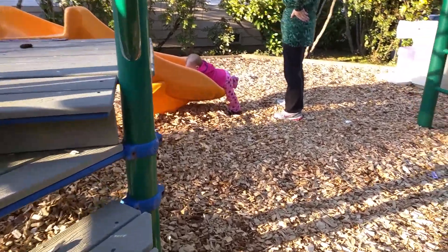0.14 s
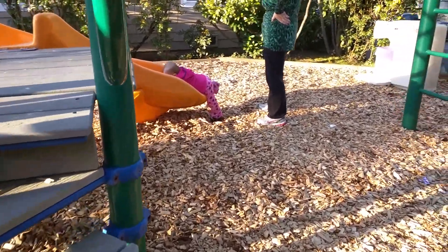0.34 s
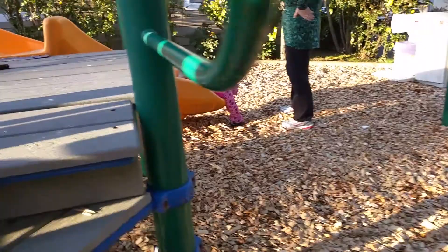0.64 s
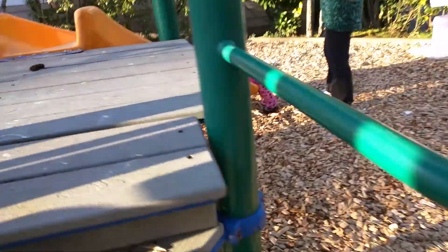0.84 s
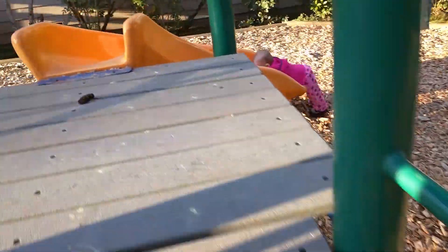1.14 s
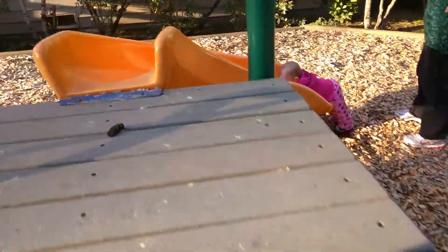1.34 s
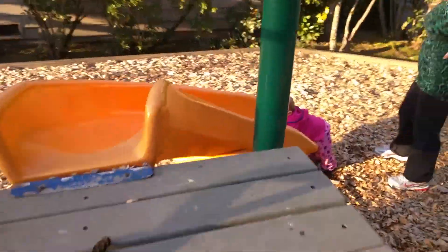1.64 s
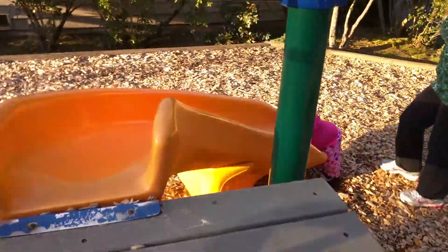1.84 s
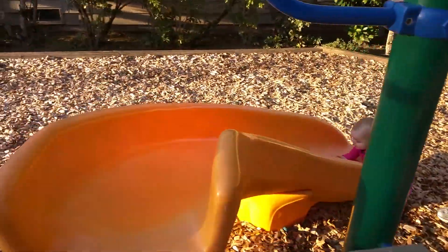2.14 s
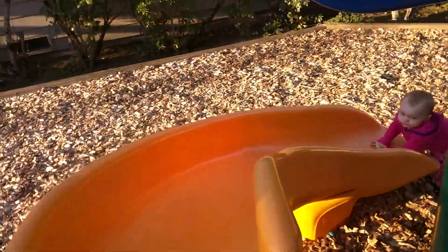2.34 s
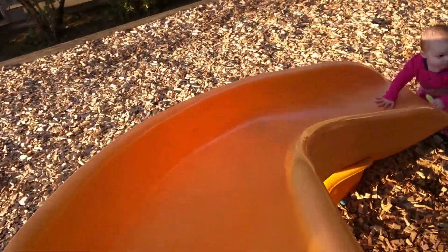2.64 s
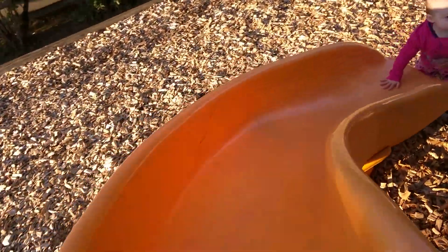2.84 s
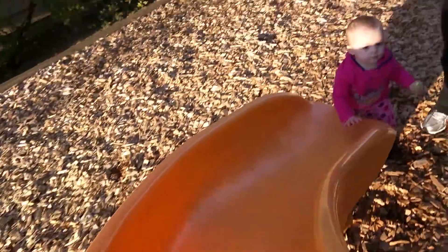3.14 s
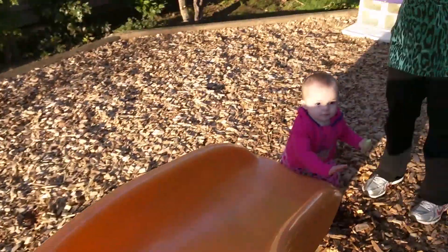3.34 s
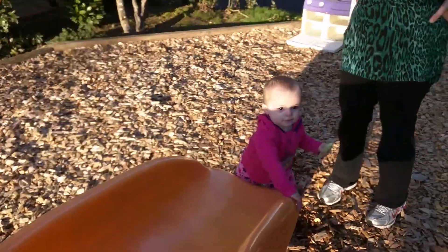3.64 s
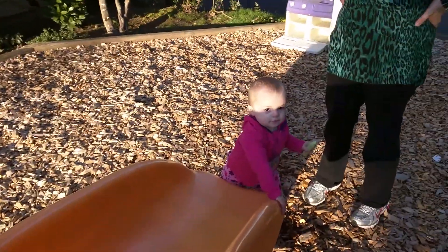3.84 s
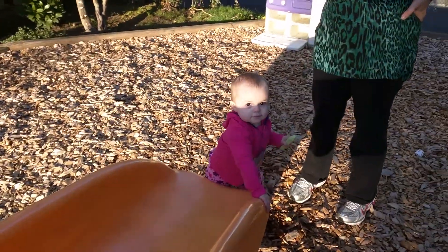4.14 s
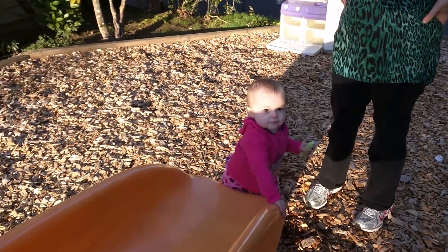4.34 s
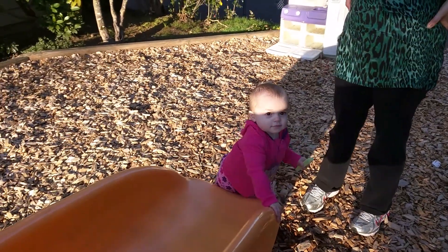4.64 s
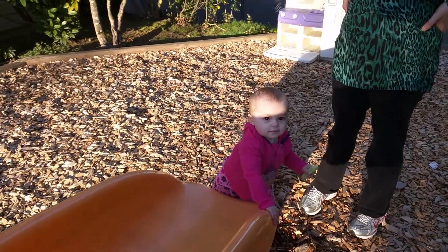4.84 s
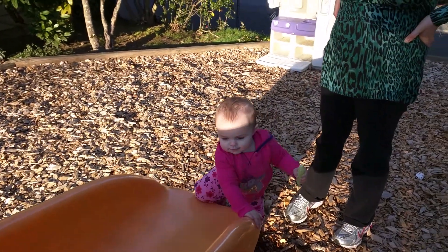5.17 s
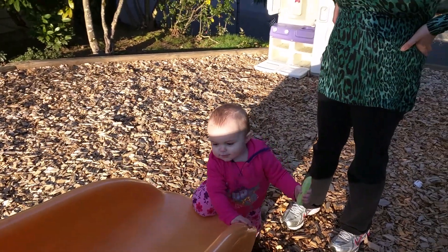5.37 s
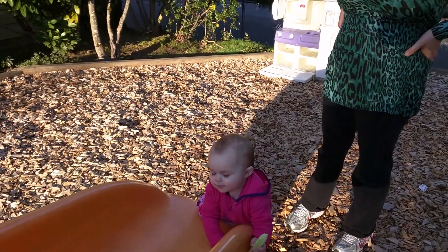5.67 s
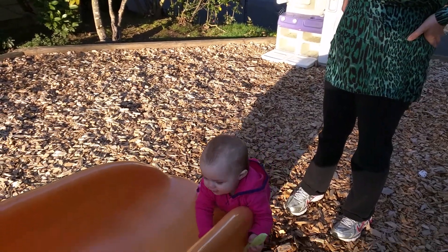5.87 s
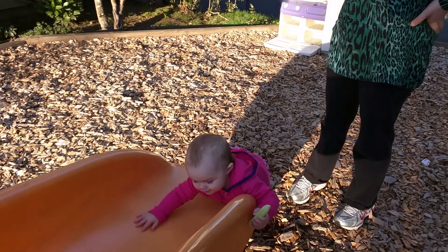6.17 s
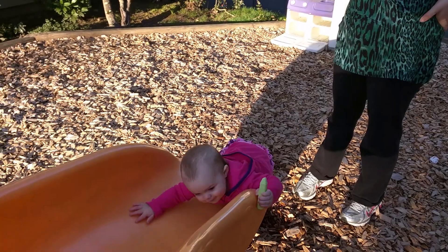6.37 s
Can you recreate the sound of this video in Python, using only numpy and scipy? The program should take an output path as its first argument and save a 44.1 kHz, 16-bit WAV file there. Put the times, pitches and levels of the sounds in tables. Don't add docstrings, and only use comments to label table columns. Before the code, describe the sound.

Low wind rumble and handling bumps on a small close microphone, with faint far traffic in an open play area. Uneven shoe knocks on hollow boards build to a loud stamp with creak, boom and short clank. Another step, a crisp snapping crunch on chips, and a fainter last step. Several quiet seconds with barely audible bird notes, then one open-hand slap on hollow plastic and a faint dragging palm.

```python
import sys
import numpy as np
from scipy import signal
from scipy.fft import rfft, irfft, next_fast_len
from scipy.io import wavfile
from scipy.ndimage import uniform_filter1d

SR = 44100
rng = np.random.default_rng(int(sys.argv[2]) if len(sys.argv) > 2 else 0)


def master_out(mix):
    frames = np.transpose(np.atleast_2d(mix))
    ceiling = np.clip(frames, -1, 1)
    pcm = np.round(ceiling * 32767).astype(np.int16)
    wavfile.write(sys.argv[1], SR, pcm)


def elevation(decibels):
    levels = np.asarray(decibels, float)
    return 10 ** (levels / 20)


N = 286994

# (t/s, peak level/dB, contact/ms, ring factor/1)
BLOWS = [(0.615, -43.5, 0.16, 1.3), (0.675, -25.5, 0.33, 0.54), (1.077, -38, 2.2, .7),
         (1.153, -36.5, 1, 0.47), (1.173, -36.5, 2.1, .7), (1.277, -27.5, 1.7, 0.39),
         (1.481, -23, 1.2, 0.24), (1.49, -8, 0.27, 1.06), (1.493, -11, 0.27, 1.15),
         (1.518, -19.5, 0.5, 0.6), (1.526, -17, 0.48, 0.92), (1.548, -19, 0.64, 3.36),
         (1.794, -38.5, 0.93, 0.86), (1.975, -40, 0.68, 1.1), (2.254, -25.5, 0.83, 0.84),
         (2.276, -25, 0.4, 2.2), (2.283, -30, 0.25, 0.61), (2.306, -28, 0.38, 1.4), (2.409, -39, 0.21, 5),
         (2.941, -36.5, 0.91, 1), (2.967, -27.5, 0.64, 1.25), (3.257, -34, 0.94, 0.5),
         (3.282, -42, 0.82, 0.94), (3.542, -40, 1.4, 0.64)]
# (f/Hz, level/dB, t60/s)
DECK = [(331, -5, 0.051), (574, -3.5, 0.041), (736, 0.5, 0.036), (824, -5, 0.034), (1017, 2, 0.041),
        (1250, 1.5, 0.013), (1412, -6, 0.14), (1800, 4.5, 0.025), (1930, 13.5, 0.013), (2230, 13, 0.011),
        (2900, 15, 0.0076), (3360, -4, 0.059), (4290, 3.5, 0.012), (5560, -8, .02), (6600, 3, 0.018)]
# (t/s, flexing level/dB, settling/s, boom level/dB)
WEIGHT = [
    (0.68, -37, 0.043, -60),
    (1.506, -27.5, 0.17, -24),
    (2.266, -36.5, 0.29, -39),
    (2.97, -40.5, 0.097, -55),
    (3.27, -44.5, 0.11, -64),
]
# (f/Hz, level/dB, t60/s)
SLIDE = [(135, -10.5, .2), (201, -7, 0.18), (258.4, -3, 0.23), (328.4, -1.5, 0.2), (421, -6.5, .13),
         (520, -6.5, 0.12), (639, -4.5, 0.12), (802, -4.5, 0.094), (953, -4.5, .085), (1150, -4, .07),
         (1436, -10, .07), (1810, -5.5, 0.056), (2190, -9.5, 0.04), (2900, -11.5, 0.037)]


def evened(x):
    return x / np.sqrt(np.mean(x ** 2) + 1e-20)


def add(mix, t_s, sound):
    part = mix[round(t_s * SR):][:len(sound)]
    part += sound[:len(part)]


def coloured(x, points):
    hz, db = np.transpose(points)
    size = next_fast_len(len(x))
    f_hz = np.fft.rfftfreq(size, 1 / SR)
    gain = elevation(np.interp(np.log(f_hz + 1), np.log(hz + 1), db))
    return evened(irfft(rfft(x, size) * gain, size)[:len(x)])


def grit(per_s, spread_db):
    size = elevation(spread_db * np.minimum(rng.exponential(1, N), 5))
    return size * rng.standard_normal(N) * (rng.random(N) < per_s / SR)


def flutter(span, depth_db):
    smooth = uniform_filter1d(rng.standard_normal(N), span)
    return elevation(depth_db * evened(uniform_filter1d(smooth, span)))


def strokes(rows, roundness=0.84):
    out = np.zeros(N)
    for peak_s, db, rise_s, fall_s in rows:
        t = np.arange(max(peak_s - 3 * rise_s, 0), peak_s + 4 * fall_s, 1 / SR)
        away = np.maximum((peak_s - t) / rise_s, (t - peak_s) / fall_s)
        add(out, t[0], elevation(db - 20 * away ** roundness))
    return out


def ring(modes, contact_ms, factor=0.62, spread_db=0., detune=0.052, cycles=0.36):
    t = np.arange(12000) / SR
    luck = rng.standard_normal((len(modes), 3, 2))
    out = np.zeros(len(t))
    for (hz, db, t60_s), trio in zip(modes, luck):
        onset = 1 - np.exp(-(t * hz / cycles) ** 2)
        for side, (level, phase) in zip((-1, 0, 1), trio):
            decay = elevation(db + spread_db * level - 60 * t / (t60_s * factor))
            out += decay * onset * np.sin(2 * np.pi * (hz * (1 + detune * side) * t + phase))
    u = np.arange(200) / SR * 1000 / max(contact_ms, .03)
    out = np.convolve(out, u * np.exp(-4 * u))
    return out / np.sqrt(np.mean(out[:400] ** 2)) / 3


def shaken(modes, contact_ms, factor, per_s, spread_db):
    body = ring(modes, contact_ms, factor, detune=0.083)
    return evened(signal.oaconvolve(grit(per_s, spread_db), body)[:N])


def deck_blows():
    out = np.zeros(N)
    for t_s, db, contact_ms, factor in BLOWS:
        add(out, t_s + .001, elevation(db) * ring(DECK, contact_ms, factor, spread_db=2., detune=.045))
    return out


def deck_rattle():
    rows = []
    for t_s, db, contact_ms, factor in BLOWS:
        rattle_db = db - 11 + 0.22 * (db + 16)
        rows.append((t_s + .003, rattle_db, .002, 0.034 * factor))
    return strokes(rows) * shaken(DECK, 0.54, 0.36, 5000, 2.3)


def joists():
    # (f/Hz, level/dB, t60/s)
    joist_modes = [(168, 4, 0.052), (244.5, 8.5, 0.065), (334, -6, 0.062), (387, 2, 0.043)]
    rise_s = .012
    rows = [(t_s, db, rise_s, settle_s) for t_s, db, settle_s, boom_db in WEIGHT]
    return strokes(rows, roundness=1.43) * shaken(joist_modes, 0.73, 0.93, 3000, 2.24)


def underdeck_boom():
    # (low f/Hz, high f/Hz, share of the high one/1, 20 dB fall/s)
    low_hz, high_hz, share, fall_s = (112., 128., 0.7, .13)
    rise_s = .03
    t = np.arange(15000) / SR
    boom = np.sin(2 * np.pi * low_hz * t) - share * np.sin(2 * np.pi * high_hz * t)
    boom = boom * elevation(-20 * (t / fall_s) ** 1.66) * np.minimum(t / rise_s, 1)
    out = np.zeros(N)
    for t_s, flex_db, settle_s, boom_db in WEIGHT:
        add(out, t_s - .002, elevation(boom_db + 3.) * boom)
    return out


def bracket():
    # (t/s, peak level/dB)
    clanks = [
        (1.526, -37),
        (1.554, -28),
        (1.567, -26.5),
        (1.596, -36),
        (2.409, -46),
        (2.945, -35),
        (2.969, -31),
    ]
    # (f/Hz, level/dB, t60/s)
    bracket_modes = [(2170, 2, .06), (3520, -6, 0.087), (5840, -4.5, 0.076), (6850, -5, 0.09)]
    out = np.zeros(N)
    for t_s, db in clanks:
        add(out, t_s, elevation(db) * ring(bracket_modes, .06, 0.97, spread_db=2., detune=0.0192))
    return out


def chip_snaps():
    # (t/s, peak level/dB, centre f/Hz)
    snaps = [(0.0228, -36, 8960), (0.6155, -38, 6390), (0.6759, -26, 5600), (1.4814, -24.5, 4020),
             (1.5539, -26, 9800), (1.5674, -31, 6870), (2.256, -32.5, 4170), (2.2832, -29, 4000),
             (2.3622, -35, 6160), (2.9444, -33, 4040), (2.9537, -20, 14100), (2.9602, -8, 7040),
             (2.9646, -3, 14500), (2.9674, -6, 8500), (2.972, -10, 5000), (2.9724, -6, 14500),
             (2.982, -15, 9150), (2.9904, -17, 10000), (2.9954, -18, 14500), (3.0224, -27, 14200),
             (3.0298, -24, 8520), (3.0365, -14.5, 9600), (3.0532, -22.5, 9260), (3.2231, -25.5, 9130),
             (3.251, -33, 10300), (3.2685, -24, 10800), (3.3258, -32.5, 9190), (3.449, -32.5, 10600),
             (3.9469, -43, 13600), (4.5057, -30.5, 13700)]
    width = 1.24
    out, t = np.zeros(N), np.arange(1500) / SR
    for t_s, db, hz in snaps:
        burst = rng.standard_normal(len(t)) * (elevation(-60 * t / .003) + .2 * elevation(-60 * t / .016))
        edges_hz = [hz / width, min(hz * width, 17000)]
        burst = signal.lfilter(*signal.butter(2, edges_hz, "band", fs=SR), burst)
        add(out, t_s + .0008, elevation(db - 1.5) * burst / abs(burst).max())
    return out


def chip_crunch():
    # (peak t/s, level/dB, rise/s, fall/s)
    crunch = [(1.49, -40, .008, 0.17), (1.556, -41, .008, 0.04), (2.26, -49, .004, 0.24),
              (2.364, -38, 0.0097, 0.011), (2.434, -49, 0.028, .017), (2.97, -15, 0.019, 0.021),
              (3.002, -46, .005, 0.034), (3.04, -40.5, .05, 0.039), (3.11, -47, 0.054, .012),
              (3.226, -45.5, .012, 0.0079), (3.264, -40.5, 0.016, .04)]
    # (f/Hz, density level/dB)
    chip_colour = [(880, -39), (1500, -28), (1810, -5), (2290, -1.5), (2900, -10.5), (4610, -1), (4940, -4),
                   (9560, -2), (11800, -4), (14700, -5), (15800, -5.5)]
    cloud = coloured(grit(13000, 2.3), chip_colour) * flutter(span=120, depth_db=-5.5)
    return elevation(-3.5) * strokes(crunch) * cloud


def slide_slap():
    # (t/s, peak level/dB)
    slaps = [
        (5.621, -7),
    ]
    # (start f/Hz, end f/Hz, fall/s, peak level/dB)
    start_hz, end_hz, fall_s, sweep_db = (1650, 380, .004, -10.5)
    t = np.arange(1500) / SR
    turns = np.cumsum(end_hz + (start_hz - end_hz) * np.exp(-t / fall_s)) / SR
    sweep = np.sin(2 * np.pi * turns) * np.minimum(t / 0.0011, 1) * np.exp(-(t / 0.0087) ** 3)
    crack = rng.standard_normal(len(t)) * elevation(-17.5 - 60 * t / 0.007)
    out = np.zeros(N)
    for t_s, db in slaps:
        add(out, t_s + 0.00117, elevation(db - 3) * ring(SLIDE, 0.1, 0.79, cycles=0.81))
        add(out, t_s + .0014, elevation(sweep_db) * sweep + uniform_filter1d(crack, size=3))
    return out


def slide_rub():
    # (peak t/s, level/dB, rise/s, fall/s)
    rubs = [
        (5.655, -33, 0.0098, 0.056),
        (5.78, -40, 0.17, 0.11),
        (6.26, -45, 0.19, .14),
    ]
    # (f/Hz, density level/dB)
    palm_colour = [(120, -50), (200, -19), (230, -8), (446, -12), (620, -0.5), (1090, -4.5), (2300, -14.5),
                   (4000, -32), (5200, -53), (8800, -120)]
    shell = 0.51 * shaken(SLIDE, 0.056, 0.43, 6500, 1.0)
    skin = 0.46 * coloured(grit(9000, 1.9), palm_colour)
    return elevation(-1.0) * strokes(rubs, roundness=1.73) * (shell + skin)


def swish():
    # (peak t/s, level/dB, rise/s, fall/s, rustle share/dB)
    swings = [(0.03, -52.5, 0.089, 0.076, -2.5), (0.38, -40.5, .28, .3, -5),
              (0.704, -48.5, 0.016, 0.02, -4), (0.81, -39, .13, .11, -8.5), (1.02, -50, 0.18, 0.25, -3.5),
              (1.28, -45.5, .16, 0.34, -5), (1.6, -52.5, .2, 0.14, -9), (1.97, -50, 0.43, 0.31, -2),
              (2.4, -55, 0.37, 0.18, -3), (2.56, -58, 0.11, .06, -1), (2.74, -50, .2, 0.21, 0.5),
              (2.97, -50, 0.12, 0.28, -2), (3.28, -50, 0.11, 0.22, -7), (3.46, -58, 0.15, 0.11, -10),
              (3.61, -54, 0.14, 0.23, -8), (5.66, -57.5, .05, .15, -4), (5.8, -53, 0.13, .08, -3.5),
              (6.05, -62, 0.079, 0.17, -20), (6.23, -59.5, 0.17, 0.19, -8)]
    # (f/Hz, density level/dB)
    hiss_colour = [(1760, -53), (3000, 0), (4450, -7), (5400, -5), (9020, -0.5), (12400, -1), (15000, -2.5),
                   (15700, -5.5)]
    # (f/Hz, density level/dB)
    rustle_colour = [(410, -5), (700, -5.5), (1060, -16), (1170, -5.5), (1280, -6), (1930, -2),
                     (5000, -11.5), (6500, -10), (11000, -120)]
    hiss = coloured(grit(15000, 0.65), hiss_colour) * strokes([row[:4] for row in swings], roundness=1.67)
    dull = [(t_s, db + share_db, rise_s, fall_s) for t_s, db, rise_s, fall_s, share_db in swings]
    rustle = coloured(grit(9000, 2.6), rustle_colour) * strokes(dull, roundness=2.0)
    return elevation(-2.5) * flutter(span=500, depth_db=0.22) * (hiss + rustle)


def case_jolts():
    # (t/s, peak level/dB, swing f/Hz)
    jolts = [(0.744, -27, 27.78), (0.822, -27, 59.5), (0.901, -17.5, 28.3), (1.049, -26, 24.2),
             (1.497, -30, 76), (2.25, -21.5, 28), (2.94, -24, 22.3), (4.271, -34, 47), (5.272, -33, 36.3)]
    out = np.zeros(N)
    for t_s, db, hz in jolts:
        u = np.arange(0, 1.6, hz / SR)
        swing = np.sin(2 * np.pi * u) * 3.2 * u * np.exp(-1.5 * u ** 2)
        add(out, t_s, -elevation(db) * swing * np.hanning(len(u)) ** .3)
    return out


def bird():
    # (start t/s, length/s, f/Hz, level/dB)
    calls = [(3.11, 0.09, 6270, -55), (3.297, .2, 6400, -55), (3.498, .11, 6400, -55),
             (4.62, .19, 6350, -61), (4.82, .25, 6660, -59.5), (5.04, 0.18, 6400, -60),
             (3.123, 0.103, 4860, -55), (4.66, .12, 5000, -61), (4.94, 0.12, 5040, -64)]
    arch_share, sag_share = 0.019, .035
    out = np.zeros(N)
    for t_s, length_s, hz, db in calls:
        arch = np.sin(np.linspace(0, np.pi, round(length_s * SR)))
        sag = np.linspace(-.5, .5, len(arch))
        fuzz = uniform_filter1d(rng.standard_normal((12000, 2)), size=100, axis=0)[:len(arch)]
        turn = 2 * np.pi * np.cumsum(hz * (1 + arch_share * (arch - .6) - sag_share * sag)) / SR
        tone = evened(fuzz[:, 0] * np.cos(turn) + fuzz[:, 1] * np.sin(turn))
        add(out, t_s, elevation(db - 6.5) * tone * arch ** .5)
    return out


def wind():
    # (t/s, level/dB)
    gusts = [(0.0, -36.5), (0.18, -45), (0.47, -41.5), (0.69, -39.5), (0.84, -34), (1.07, -41.5),
             (1.25, -39), (1.4, -41), (1.55, -28), (1.8, -38.5), (2.05, -45), (2.3, -29.5), (2.46, -35),
             (2.68, -39), (3.0, -35.5), (3.12, -40.5), (3.37, -42), (3.7, -44), (4.36, -40.5), (4.52, -53),
             (4.87, -47), (5.29, -40), (5.7, -43)]
    # (f/Hz, density level/dB)
    wind_colour = [(4.7, -8), (8.0, 19), (27, 10.5), (85, 6), (119, 0.5), (152, -4), (202, -8), (300, -18),
                   (390, -16), (660, -120)]
    rise_s, fall_s, calm_db = 0.1, 0.17, -46
    gain = strokes([(t_s, db, rise_s, fall_s) for t_s, db in gusts], roundness=1.44)
    return np.hypot(gain, elevation(calm_db)) * coloured(rng.standard_normal(N), wind_colour)


def traffic():
    # (f/Hz, density level/dB)
    traffic_colour = [(80, -12), (130, 0), (180, -4), (260, -9), (400, -10), (1000, -8.5), (1600, -9),
                      (2150, -11.5), (2600, -19), (4000, -24), (5000, -28), (9000, -27.5), (13000, -28.5),
                      (15800, -30)]
    roar = coloured(rng.standard_normal(N), traffic_colour)
    return elevation(-54.5) * roar * flutter(span=6000, depth_db=.4)


def scene():
    near = deck_blows() + deck_rattle() + joists() + underdeck_boom() + bracket()
    near = near + chip_snaps() + chip_crunch() + slide_slap() + slide_rub()
    t = np.arange(5000) / SR
    tail = rng.standard_normal(len(t)) * elevation(-60 * t / 0.056) * (t > .003)
    near = near + elevation(-9) * signal.oaconvolve(near, tail / np.linalg.norm(tail))[:N]
    return (near + swish() + case_jolts() + bird() + wind() + traffic())[None]


def low_pass(x):
    return signal.sosfilt(signal.butter(12, 16490, fs=SR, output="sos"), x)


def record(dry):
    edge_hz = 15950
    limited = .75 * np.tanh(dry / .75)
    lowpass = signal.firwin(511, edge_hz, window=("kaiser", 9), fs=SR)
    mix = signal.oaconvolve(limited, lowpass[None], "same")
    return low_pass(mix)


dry = scene()
out = record(dry)
master_out(out)
```